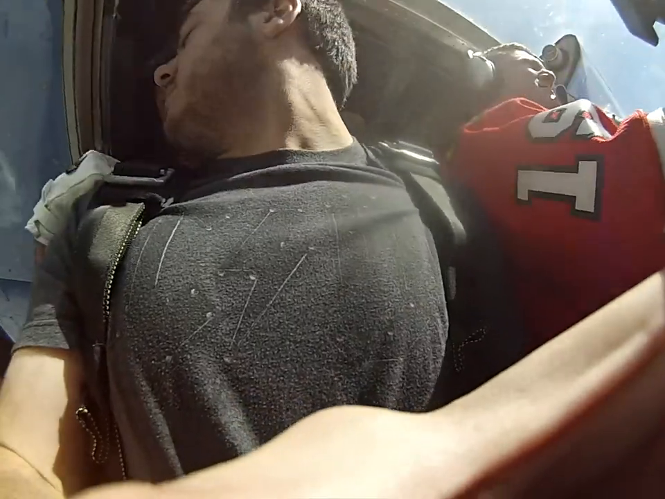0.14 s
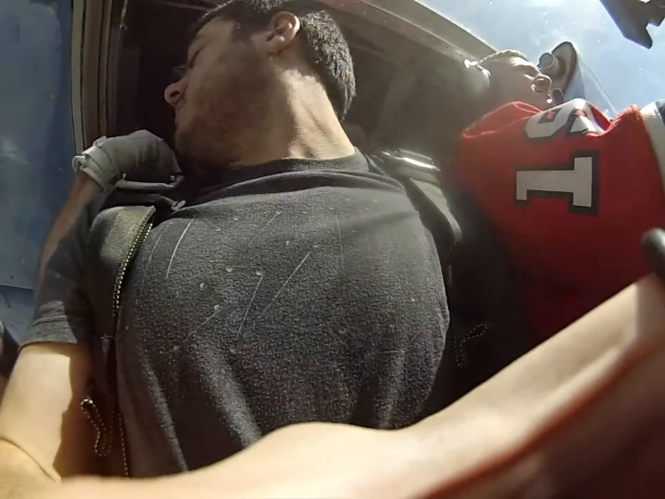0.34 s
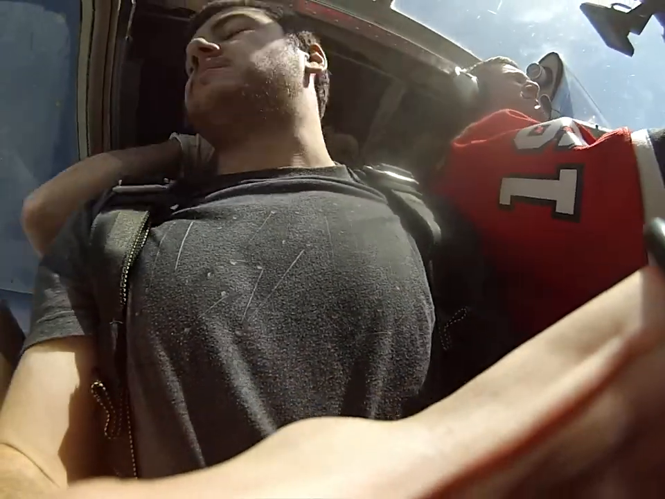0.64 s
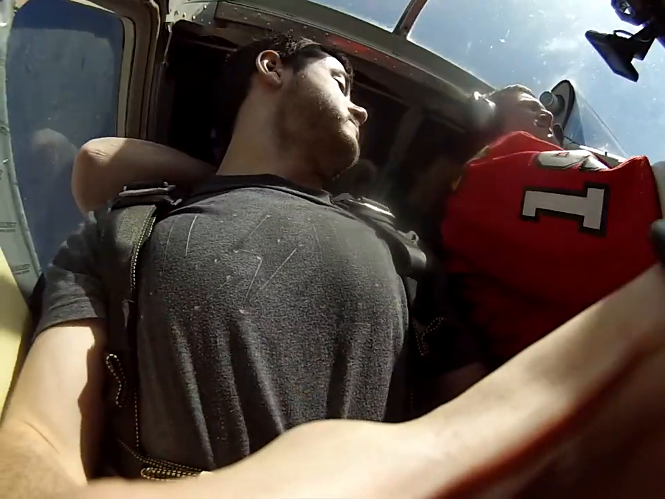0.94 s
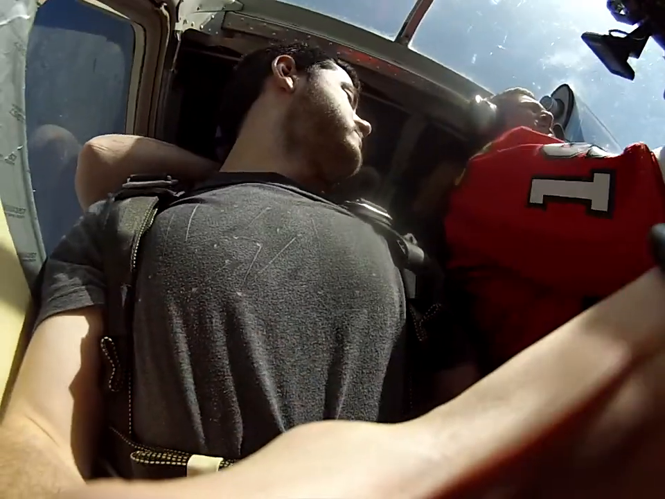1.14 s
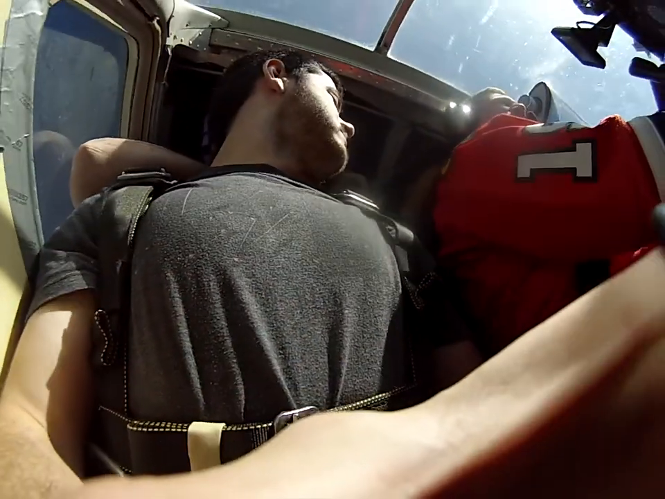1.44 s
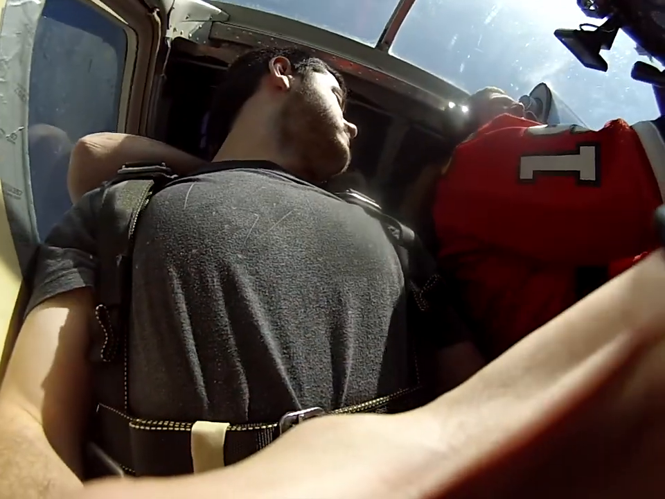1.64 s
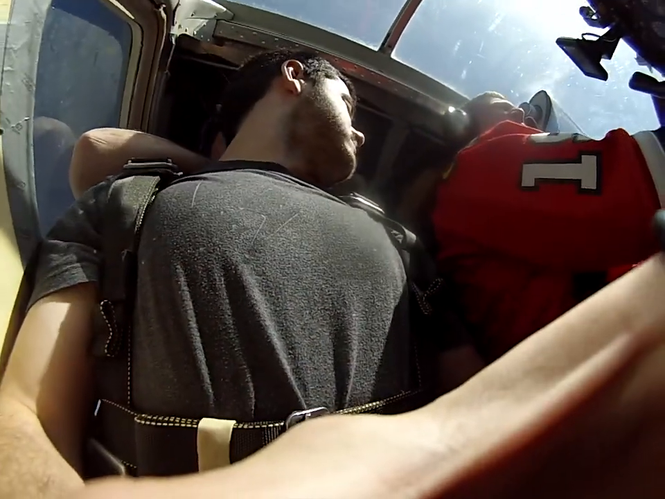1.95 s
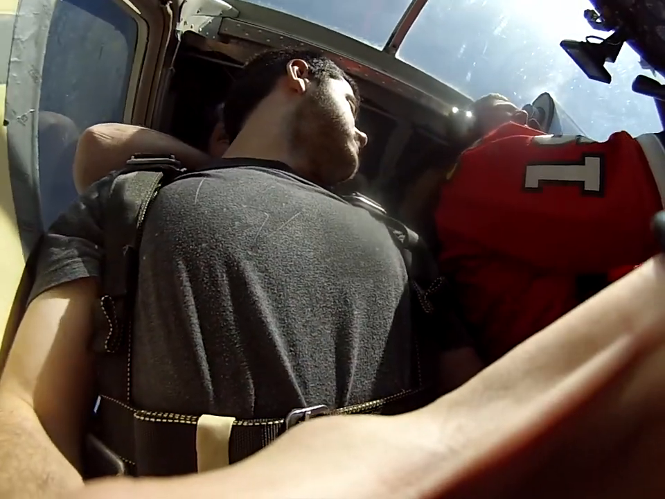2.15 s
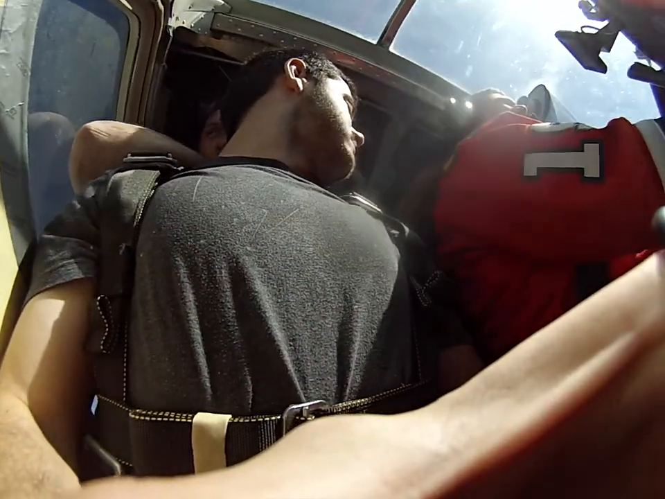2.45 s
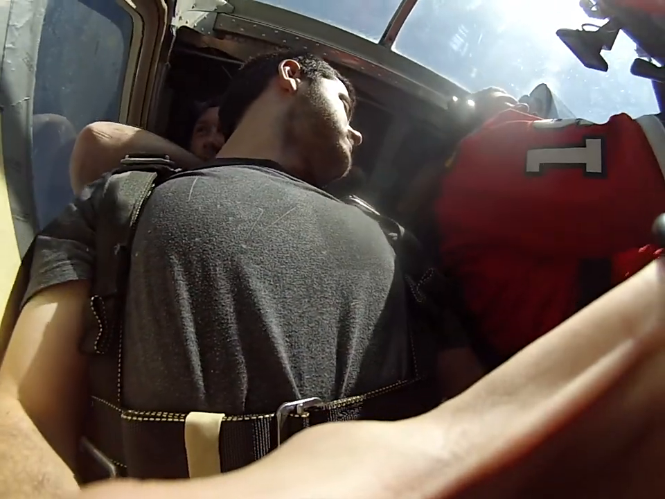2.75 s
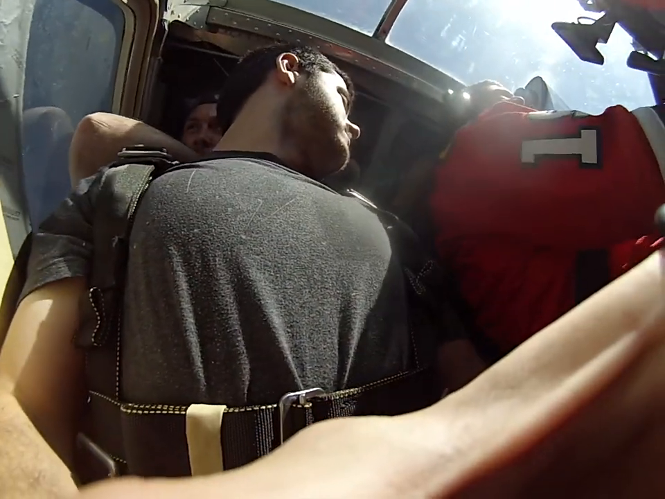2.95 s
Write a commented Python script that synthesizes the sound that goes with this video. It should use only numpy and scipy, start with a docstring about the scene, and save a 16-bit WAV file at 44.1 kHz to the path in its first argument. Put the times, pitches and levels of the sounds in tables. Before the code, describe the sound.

A loud, low, buzzing propeller-plane drone holds constant inside a small cabin amid slipstream roar

```python
"""The drone of a four-cylinder engine and its propeller, heard in a light aircraft's cabin at steady power.
The drone is a harmonic series on the four-stroke cycle rate; its upper multiples flutter and buzz.
Slipstream is coloured noise: it rushes over skin and windows, and rasps with each firing.
Turbulence adds a deep buffet, a rumble and a hollow boom; a narrow band of noise whistles faintly."""
import sys
import numpy as np
from scipy import signal
from scipy.fft import rfft, irfft, next_fast_len
from scipy.io import wavfile
from scipy.ndimage import uniform_filter1d, map_coordinates

SR = 44100
rng = np.random.default_rng(int(sys.argv[2]) if len(sys.argv) > 2 else 0)


def wav_out(sig):
    """Save sig, one row per channel (or a flat mono array), as 16-bit PCM at SR to the path in sys.argv[1]."""
    wavfile.write(sys.argv[1], SR, np.round(np.clip(np.atleast_2d(sig).T, -1, 1) * 32767).astype(np.int16))


N = 136710

# engine speed: (time [s], four-stroke cycle rate [Hz])
CYCLE_RATE = [(0, 20.297), (.5, 20.292), (1.5, 20.273), (2.2, 20.288), (3.1, 20.302)]
# strong lines of the drone; 4 is the firing and blade rate:
# (multiple of the cycle rate [-], level before the common drone trim [dB])
STRONG_LINES = [(1, -35), (2, -32), (3, -37), (4, -18.1), (6, -24.3), (7, -32.3), (8, -30), (9, -29.3),
                (10, -40), (12, -40), (14, -35), (15, -32.5), (16, -33), (18, -41.5), (21, -44), (22, -43),
                (24, -41.5), (27, -36.5), (28, -43.5), (32, -45), (34, -47), (36, -44.5), (39, -45),
                (48, -46), (50, -44.5), (68, -53)]
# exhaust pulses within one cycle: (position [share of the cycle], strength [-])
EXHAUST_PULSES = [(.02, 0.75), (.225, 0.8), (.51, 0.93), (.735, 0.4696)]


def amp(db):
    """Level to amplitude: 20 dB is a factor of ten."""
    return 10 ** (np.asarray(db) / 20)


def unit(x):
    """Normalization by the root mean square, to rms 1."""
    return x / np.sqrt(np.mean(x ** 2) + 1e-20)


def along(points, hz):
    """Interpolation of (frequency [Hz], value) points on a logarithmic frequency axis."""
    f, v = np.transpose(points)
    return np.interp(np.log(hz + 1), np.log(f + 1), v)


def curve(rows):
    """Linear interpolation of (time [s], value) points, one value per sample."""
    return np.interp(np.arange(N) / SR, *np.transpose(rows))


def wobble(rate):
    """Band-limited random modulation: a smooth curve through random knots, rate knots a second."""
    grid = np.linspace(0, N / SR, 1024)
    knots = rng.standard_normal(512)
    smooth = map_coordinates(knots, [grid * rate], mode="mirror")
    return np.interp(np.arange(N) / SR, grid, smooth)


def filtered(x, response):
    """Linear filtering: the spectrum of x times a response of frequency."""
    m = next_fast_len(N + SR // 2)  # room for the filter's tail
    return irfft(rfft(x, m) * response(np.fft.rfftfreq(m, 1 / SR)), m)[:N]


def noise(spectrum, patchy_db):
    """Turbulent noise of rms 1: eddies are time-frequency patches of random gain, then coloured."""
    cells = signal.stft(rng.standard_normal(N), nperseg=512)[2]
    field = uniform_filter1d(rng.standard_normal(cells.shape), size=7, axis=0)  # across frequency
    field = uniform_filter1d(field, size=12, axis=1)  # across time
    air = signal.istft(cells * amp(patchy_db * unit(field)), nperseg=512)[1][:N]
    return unit(filtered(air, lambda hz: amp(along(spectrum, hz))))


def resonance(hz, width_hz):
    """Resonant filtering: noise of rms 1 in a two-pole-pair band, width_hz wide at -6 dB."""
    return unit(filtered(rng.standard_normal(N), lambda f: 1 / (1 + 2j * (f - hz) / width_hz) ** 2))


def even(x):
    """Envelope normalization: slow chance swells levelled by the running rms over 1/8 s."""
    return x / np.sqrt(np.abs(uniform_filter1d(x ** 2, size=SR // 8)) + 1e-9)


def line(cycles, multiple, waver_db):
    """Fourier component of the pulse train: one wavering multiple, more scrambled in phase higher up."""
    blade_lead = .018  # share of the cycle by which the blades pass ahead of the exhaust pulses
    pulses = sum(size * np.exp(-2j * np.pi * multiple * at) for at, size in EXHAUST_PULSES)
    scramble = rng.normal() * min((multiple / 20) ** 2, np.pi)  # by the cabin
    phase = np.angle(pulses) + scramble
    lead = blade_lead if multiple % len(EXHAUST_PULSES) == 0 else 0
    tone = np.sqrt(2) * np.cos(2 * np.pi * multiple * (cycles + lead) + phase)
    return tone * amp(waver_db * wobble(4.014))


def drone(cycles):
    """Harmonic series of exhaust and propeller: strong lines, steadiest at the firing rate."""
    # the cabin's midrange lines come forward early on: (time [s], gain [dB])
    mid_lines = [(0, -13), (.55, -8), (.82, 3), (3.1, 4)]
    # limits of that midrange: (lower [Hz], upper [Hz])
    mid_band = (430, 830)
    trim_db = -1
    throb_db, waver_db_per_octave = .3, .45  # waver of the firing line, and its growth away from it
    out, mid_gain = np.zeros(N), amp(curve(mid_lines))
    for multiple, db in STRONG_LINES:
        k = round(multiple)
        octaves_away = abs(np.log2(k / len(EXHAUST_PULSES)))
        waver_db = throb_db + waver_db_per_octave * octaves_away
        in_mid = mid_band[0] < k * CYCLE_RATE[0][1] < mid_band[1]
        out += amp(db + trim_db) * line(cycles, k, waver_db) * (mid_gain if in_mid else 1)
    return out


def buzz(cycles, count):
    """Subharmonics of the firing rate: unequal cylinders fill the other multiples with weak flutter."""
    # weak lines between and above the strong ones: (frequency [Hz], level per line [dB])
    weak_lines = [(100, -37), (260, -41.5), (400, -64), (700, -53), (1000, -53.5), (1200, -58.5),
                  (2000, -64.5), (3000, -65.5)]
    strong = {round(k) for k, db in STRONG_LINES}
    out = np.zeros(N)
    for k in range(1, count):
        if k not in strong:
            level_db = along(weak_lines, k * CYCLE_RATE[0][1])
            out += amp(level_db) * line(cycles, k, waver_db=2.0)
    return out


def rasp(cycles):
    """Periodic amplitude modulation: a noise gain of rms 1 with a puff at each firing."""
    depth = 0.49  # lift per unit of firing strength, before scaling to rms 1
    width, lead = 0.066, 0.088  # standard deviation and lead of a puff, shares of the cycle
    puffs = np.zeros(N)
    for at, size in EXHAUST_PULSES:
        offset = (cycles - at + lead + .5) % 1 - .5  # wrapped distance from the puff's peak
        puffs += size * np.exp(-.5 * (offset / width) ** 2)
    return unit(1 + depth * puffs)


def slipstream(cycles):
    """Boundary-layer noise: rush and window hiss follow the flow and pulse with the engine."""
    # slipstream rush heard through the cabin: (frequency [Hz], relative level [dB])
    rush_spectrum = [(150, -21), (400, -2), (520, 1), (555, 3.5), (592, 6.5), (690, -1.5), (850, -1),
                     (1000, 2), (1100, -2.5), (1270, -2), (1400, -5), (1550, -4.5), (1880, -10.5),
                     (2030, -8), (2170, -11.5), (2400, -11), (2600, -14.5), (2800, -11.5), (3130, -14.5),
                     (3450, -16), (4000, -27.5), (5000, -35), (9000, -78)]
    # hiss at the windows: (frequency [Hz], relative level [dB])
    hiss_spectrum = [(1500, -28.5), (3500, 3.5), (5000, -2.5), (5900, 1.5), (7000, -4.5), (8900, -5),
                     (10500, -14), (14000, -26)]
    # strength of the slipstream: (time [s], level before its mean is removed [dB])
    flow = [(0, -.6), (.28, -1.6), (.43, 0.7), (.63, -2.2), (.75, 2), (.9, -0.9), (1.02, 0.5), (1.15, -1),
            (1.3, -0.2), (1.45, -0.4), (1.68, -1), (1.8, 1.5), (1.92, -0.5), (2.13, -0.9), (2.36, 2.4),
            (2.5, 0.7), (2.66, -1.5), (2.74, 0.4), (2.84, -0.8), (3, 0.3), (3.1, 1.9)]
    flow_db = curve(flow)
    rush = amp(-27) * noise(rush_spectrum, patchy_db=0.8)
    hiss = amp(-53.5) * noise(hiss_spectrum, patchy_db=1.25)
    return amp(flow_db - flow_db.mean()) * rasp(cycles) * (rush + hiss)


def turbulence():
    """Broadband excitation by eddies: buffet, rumble and hollow boom, each surging in its own time."""
    # deep buffeting of the airframe: (frequency [Hz], relative level [dB])
    buffet_spectrum = [(12, -27), (28, -15), (41, 1), (57, 0), (72, -6), (100, -20), (200, -60),
                       (600, -150)]
    # slipstream rumble in the cabin's resonances: (frequency [Hz], relative level [dB])
    rumble_spectrum = [(50, -30), (80, -7), (105, -2.5), (135, 2), (165, 1.5), (205, -1), (240, -3),
                       (268, -7.5), (330, -11), (400, -12), (500, -20), (900, -36), (4000, -130)]
    # surges of the buffet: (time [s], level [dB])
    buffet_level = [(0, -29), (.12, -22.5), (.55, -25), (.7, -28.5), (.83, -21.5), (1, -24.5), (1.13, -22),
                    (1.6, -24.5), (1.8, -28), (2, -24), (2.45, -25), (2.6, -22.5), (2.76, -25.5),
                    (2.88, -21), (3.03, -27), (3.1, -26)]
    # surges of the rumble: (time [s], level [dB])
    rumble_level = [(0, -31), (.28, -25.5), (.38, -23.5), (.5, -26.5), (1.0, -29), (1.23, -26.5),
                    (1.48, -23.5), (1.65, -22.5), (1.85, -24.5), (2.2, -27.5), (2.38, -21), (2.68, -27),
                    (2.78, -25.5), (2.9, -26.5), (3.1, -23)]
    # surges of the hollow cabin resonance: (time [s], level [dB])
    boom_level = [(0, -22), (.14, -35), (.22, -26.5), (.3, -30.5), (.42, -21.5), (.54, -29.5), (.65, -43),
                  (.77, -23), (.9, -30), (1.05, -25), (1.17, -41), (1.57, -29.5), (1.72, -36.5),
                  (2.15, -33.5), (2.33, -27.5), (2.55, -33.5), (2.75, -32.5), (3.1, -32.5)]
    buffet = amp(curve(buffet_level)) * even(noise(buffet_spectrum, patchy_db=-1.5))
    rumble = amp(curve(rumble_level)) * even(noise(rumble_spectrum, patchy_db=0))
    boom = amp(curve(boom_level)) * even(resonance(hz=338, width_hz=62))
    return buffet + rumble + boom


def whistle():
    """Narrow-band flow noise: a faint breathy whistle, as of air at a window seal."""
    # strength of the whistle: (time [s], level [dB])
    whistle_level = [(0, -53), (1.5, -47.5), (1.85, -48), (2.5, -43), (3.1, -42)]
    return amp(curve(whistle_level)) * resonance(hz=2880, width_hz=260)


def cabin(x):
    """Time-varying spectral colouring: the cabin's tint drifts as the passengers shift."""
    # how much of the tint is applied: (time [s], amount [share])
    tint_share = [(0, 1.05), (.7, 0.5), (1.2, 0), (1.9, -0.06), (2.4, -0.24), (3.1, -0.3)]
    # colour at a share of one: (frequency [Hz], gain [dB])
    tint = [(85, -0.5), (120, 2.2), (160, -0.85), (200, -2.5), (250, 0.5), (300, -1), (355, -1.2),
            (450, 1.5), (1000, 0), (1700, 2), (2300, 1.5), (3300, -0.4), (4200, -0.8), (5500, 2.3),
            (9000, 1.7)]
    return x + curve(tint_share) * filtered(x, lambda hz: amp(along(tint, hz)) - 1)


def scene():
    """Superposition of engine and air, with lines and rasp timed by one jittered crankshaft phase."""
    jitter_s = .00005  # scatter of the firing times
    speed = curve(CYCLE_RATE)
    cycles = np.cumsum(speed) / SR + jitter_s * speed * wobble(29.94)
    engine = drone(cycles) + buzz(cycles, count=110)
    air = slipstream(cycles) + turbulence() + whistle()
    return cabin(engine + air)[None]


def record(dry):
    """Band limitation: a short linear fade-in, then nothing kept above the top frequency."""
    fade_s, top_hz = .002, 14800
    opening = np.minimum(np.arange(N) / SR / fade_s, 1)
    return np.array([filtered(ch * opening, lambda hz: hz < top_hz) for ch in dry])


dry = scene()
out = record(dry)
wav_out(out)
```